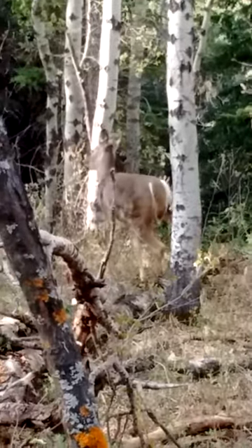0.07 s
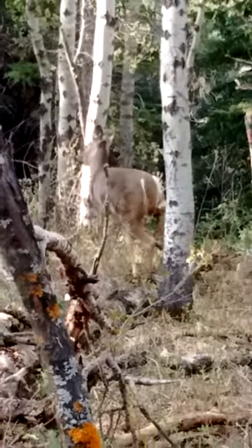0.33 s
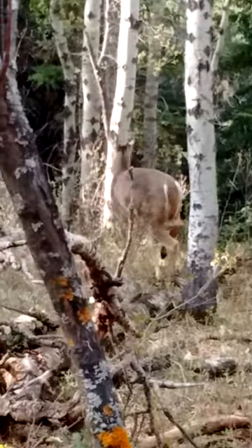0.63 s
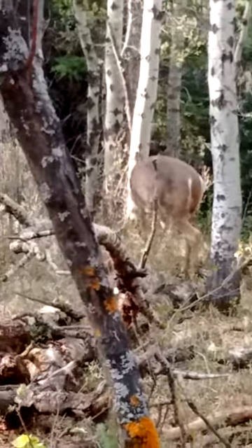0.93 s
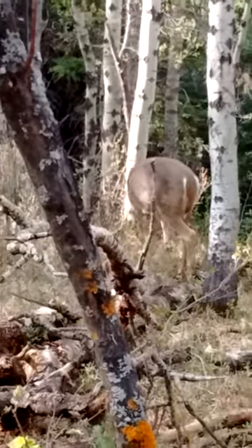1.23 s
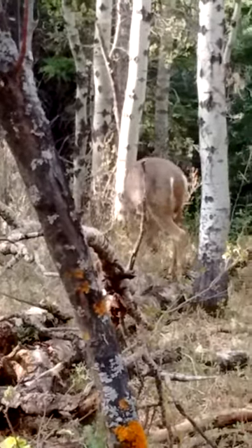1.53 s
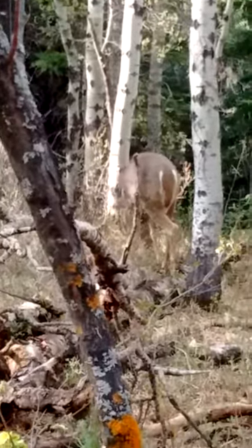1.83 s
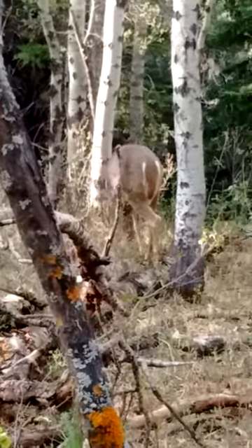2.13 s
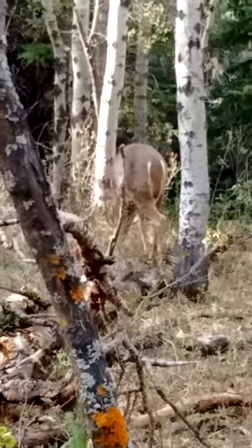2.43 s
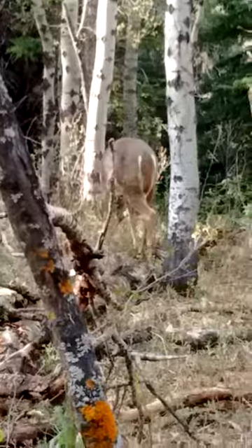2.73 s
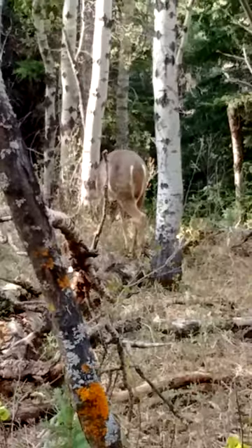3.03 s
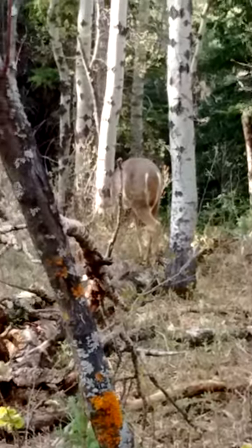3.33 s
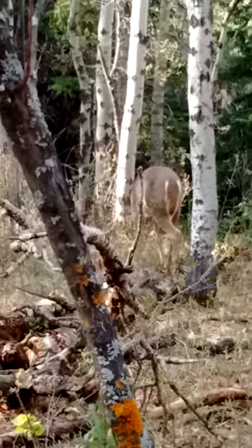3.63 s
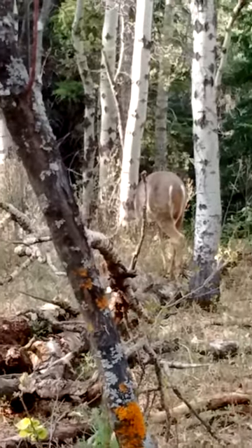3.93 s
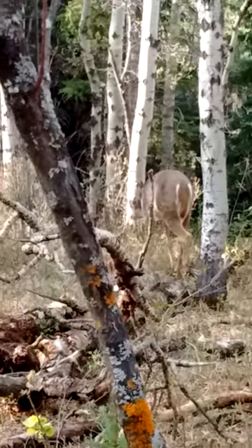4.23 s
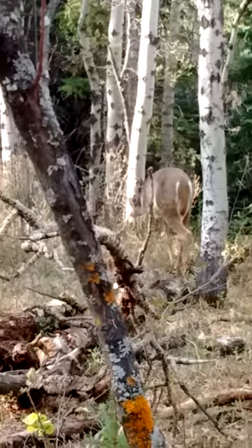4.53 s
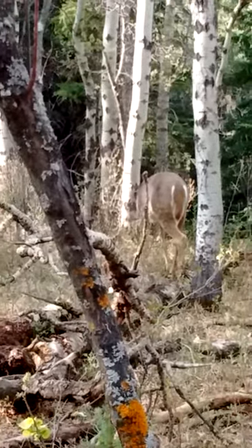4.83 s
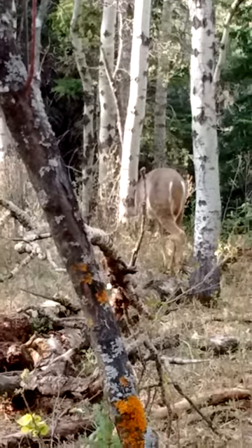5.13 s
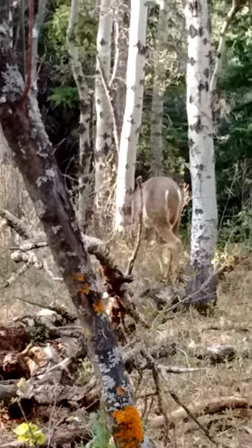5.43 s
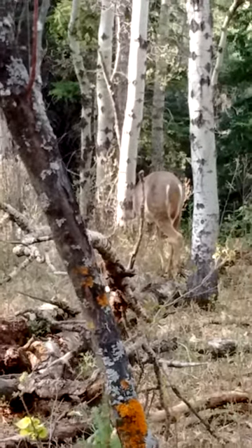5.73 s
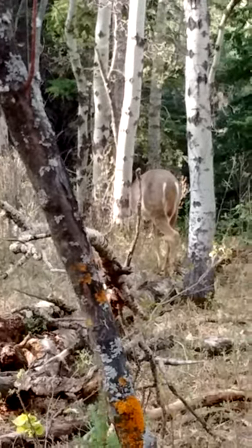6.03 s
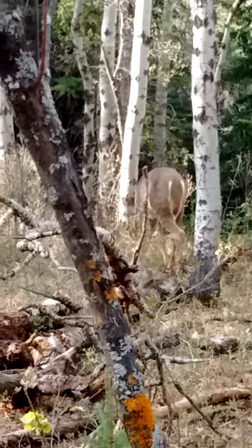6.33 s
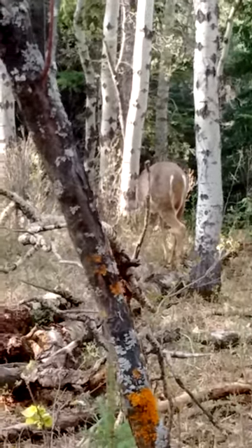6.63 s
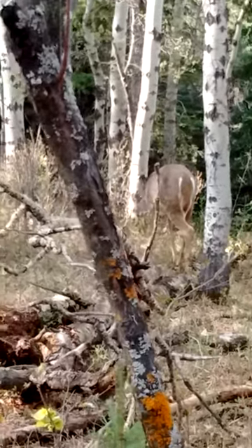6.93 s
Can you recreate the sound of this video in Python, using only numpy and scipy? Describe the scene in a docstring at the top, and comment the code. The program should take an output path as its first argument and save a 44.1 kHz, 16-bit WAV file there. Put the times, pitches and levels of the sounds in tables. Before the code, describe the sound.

A low wash of air and a faint hiss of leaves run steadily in quiet woods. About a second in, cloth brushes the microphone of a hand-held camera in four quick, scratchy strokes, then settles in faint slides. A small tick and a few soft, low bumps of the hand follow, leaving only the quiet air.

```python
"""Cloth on a camera in quiet woods

A low wash of air and a faint hiss of leaves surround a hand-held camera; the hand bumps and knocks
the case. Cloth brushes one microphone port in four quick strokes, its threads slipping and catching,
then settles. The stereo is widened by subtracting each port, delayed, from the other."""
import sys
import numpy as np
from scipy import signal
from scipy.fft import rfft, irfft, next_fast_len
from scipy.io import wavfile
from scipy.ndimage import uniform_filter1d

SR = 44100
rng = np.random.default_rng(int(sys.argv[2]) if len(sys.argv) > 2 else 0)


def put_to_file(sound):
    """Save the sound as 16-bit audio at rate SR, in the file named by the first command-line argument."""
    columns = np.atleast_2d(sound).T  # one column per channel
    safe = np.clip(columns, -1, 1)
    whole_steps = np.round(safe * 32767)
    wavfile.write(sys.argv[1], SR, whole_steps.astype(np.int16))


N = 307818


def from_db(db):
    """Decibels to amplitude gain."""
    return 10 ** (np.asarray(db) / 20)


def unit_rms(x):
    """Scale to rms 1."""
    return x / np.sqrt(np.mean(x ** 2) + 1e-20)


def db_at(spectrum, hz):
    """Interpolate a spectrum on a log frequency axis."""
    points_hz, points_db = np.transpose(spectrum)
    return np.interp(np.log(hz + 1), np.log(points_hz + 1), points_db)


def add_at(mix, time_s, sound):
    """Mix a sound in place, from time_s on."""
    part = mix[round(time_s * SR):][:len(sound)]
    part += sound[:len(part)]


def colour(x, spectrum, size=4096):
    """Minimum-phase filter with the spectrum's shape and unit power gain."""
    log_gain = np.log(from_db(db_at(spectrum, abs(np.fft.fftfreq(size, 1 / SR)))))
    response = np.exp(np.conj(signal.hilbert(log_gain)))
    taps = np.fft.ifft(response).real
    return signal.oaconvolve(x, taps / np.linalg.norm(taps))[:len(x)]


def resonate(x, hz, width_hz):
    """Unity-gain resonance that tracks the curve hz."""
    carrier = np.exp(2j * np.pi * np.cumsum(hz) / SR)
    pole = np.exp(-np.pi * width_hz / SR)
    return 2 * (carrier * signal.lfilter([1 - pole], [1, -pole], x / carrier)).real


# air and leaves, in phase and in antiphase at the ports: (frequency [Hz], density [dB/Hz])
AIR_IN_PHASE = [(25, -69.5), (60, -70), (130, -74), (220, -81.5), (400, -88), (700, -91.5), (1000, -90),
                (1500, -94.5), (2400, -97.5), (4200, -102), (6400, -109), (8500, -105), (15000, -108)]
AIR_ANTIPHASE = [(25, -77.5), (60, -75), (130, -72), (220, -72), (400, -78.5), (700, -80), (1000, -82.5),
                 (1500, -93.5), (2400, -96.5), (4200, -101), (6400, -109), (8500, -105), (15000, -108)]
# brief dips in the air: (centre [s], depth [dB], half length [s])
LULLS = [(5.773, -2, 0.083), (6.796, -2.5, 0.21)]


def air(spectrum, patch_db, trim_db=-0.02):
    """Wash of air and leaves: noise that drifts in patches and sinks in the lulls."""
    hz, frame_s, bins = signal.stft(rng.standard_normal(N) * np.sqrt(SR / 2), SR, nperseg=2048)
    patches = uniform_filter1d(rng.standard_normal(bins.shape), size=14, axis=0)
    patches = unit_rms(uniform_filter1d(patches, size=5, axis=1))
    lull_db = sum(db * np.exp(-((frame_s - centre_s) / half_s) ** 2) for centre_s, db, half_s in LULLS)
    density_db = trim_db + db_at(spectrum, hz)[:, None] + patch_db * patches + lull_db
    return signal.istft(bins * from_db(density_db), SR, nperseg=2048)[1][:N]


# soft jolts of the shifting grip: (time [s], impulse [dB], contact [s])
GRIP_BUMPS = [(0.034, -3, 0.011), (3.497, -6.5, 0.0098), (3.596, 2, 0.016), (3.708, 0, 0.018),
              (3.769, 5, 0.016)]
# knocks of the hand: (time [s], impulse [dB], contact [s])
HAND_KNOCKS = [(0.0385, -0.5, 0.00011), (0.925, -9.5, 0.0015), (0.957, -6, 0.0027), (1.198, -8, 0.00081),
               (2.6332, 1.5, 0.00007)]
# case response, a dull thump with a short ring and a tiny tick: (frequency [Hz], relative level [dB])
CASE_SPECTRUM = [(15, -18), (45, -3), (105, 5.5), (250, -3.5), (550, -12), (1000, -26.5), (1500, -26.5),
                 (1830, -24), (2200, -39), (3400, -34), (5200, -45), (6800, -37), (8400, -30), (12000, -38),
                 (16000, -52)]


def case_impacts(impacts):
    """Each impact is one force pulse into the case; longer contact is duller."""
    force = np.zeros(N)
    for time_s, impulse_db, contact_s in impacts:
        pulse = np.hanning(max(round(contact_s * SR), 1) + 2)
        add_at(force, time_s, from_db(impulse_db) * pulse / pulse.sum())
    return colour(force, CASE_SPECTRUM)


# dry snap of cloth: (frequency [Hz], relative level [dB])
SNAP_SPECTRUM = [(200, -27), (1000, 3), (2500, -1), (3800, 6), (6000, -7), (8500, -5), (11000, -21),
                 (14000, -27)]


def snap(time_s=0.897, energy_db=-13):
    """The cloth first touches the case: one click, almost no ring."""
    return colour(from_db(energy_db) * signal.unit_impulse(N, round(time_s * SR)), SNAP_SPECTRUM)


def envelope_db(t, hold_s, attack_s, release_s):
    """Rise to 0 dB at t = 0, hold, fall ever faster; attack_s and release_s each span 14.5 dB."""
    before = np.maximum(-t, 0) / attack_s
    after = np.maximum(t - hold_s, 0) / release_s
    return -14.5 * (before + after ** 1.35)


def friction(level_db, tilt_db_oct, slips_per_s, spread_db, hiss_share, judder_db, pivot_hz=4000):
    """Threads slip in tiny uneven clicks over a smooth hiss; contact pressure judders."""
    slips = rng.standard_normal(N) * from_db(spread_db * np.minimum(rng.exponential(1, N), 3))
    slips *= rng.random(N) < slips_per_s / SR
    rub = np.sqrt(1 - hiss_share) * unit_rms(slips) + np.sqrt(hiss_share) * rng.standard_normal(N)
    hz, frame_s, bins = signal.stft(rub, SR, nperseg=256)
    octaves = np.log2(np.maximum(hz, 1000) / pivot_hz)
    tilt_db = octaves[:, None] * np.interp(frame_s * SR, np.arange(N), tilt_db_oct)
    tilted = signal.istft(bins * from_db(tilt_db), SR, nperseg=256)[1][:N]
    judder = unit_rms(uniform_filter1d(rng.standard_normal(N), size=180))  # 4 ms
    return tilted * from_db(np.maximum(level_db, -200) + judder_db * judder)


# cloth strokes: (time at full speed [s], hold [s], level [dB], attack [s], release [s],
#   start tilt [dB/oct], end tilt [dB/oct], resonance scale [ratio], zip start [Hz])
STROKES = [ (0.921, 0.079, -36, 0.0087, 0.0071, 6, -1, 1.02, 4280),
           (1.129, 0.02, -29.5, 0.00069, 0.031, -3, 1, 0.99, 4160),
           (1.198, 0.064, -25.5, 0.03, 0.033, -0.1, 1.2, 1.04, 3980),
           (1.292, 0.033, -26.5, 0.045, 0.034, 2, 1, 0.98, 3720), ]
# rubbing cloth at the port: (frequency [Hz], relative level [dB])
RUB_SPECTRUM = [(40, -20), (180, -7.5), (500, -17.5), (1000, -15), (2000, -10), (2800, -4.5), (3800, -0.5),
                (4700, -5), (5500, -12), (6150, -13), (7000, -11), (8600, -10), (10000, -20),
                (11300, -24.5), (12400, -26), (14000, -65)]
SAG_DB_PER_S = -24
ZIP_DB, ZIP_WIDTH_HZ, ZIP_CLIMB_HZ_PER_S = -5, 550, 4300


def stroke(time_s, hold_s, db, attack_s, release_s, start_tilt, end_tilt, scale, zip_hz):
    """Cloth drags and slowly loses pressure; the ribs of the weave add a fuzzy, climbing zip."""
    t = np.arange(N) / SR - time_s
    held_s = np.clip(t, 0, hold_s)
    level_db = db + envelope_db(t, hold_s, attack_s, release_s) + SAG_DB_PER_S * held_s
    tilt_db_oct = start_tilt + (end_tilt - start_tilt) * held_s / hold_s
    drag = friction(level_db, tilt_db_oct, slips_per_s=7000, spread_db=1.5, hiss_share=0.75, judder_db=1.1)
    rib_hz = zip_hz + ZIP_CLIMB_HZ_PER_S * held_s
    ribs = resonate(resonate(rng.standard_normal(N), rib_hz, ZIP_WIDTH_HZ), rib_hz, ZIP_WIDTH_HZ)
    zipping = unit_rms(ribs) * from_db(np.maximum(level_db, -200) + ZIP_DB)
    return colour(drag, [(hz * scale, gain_db) for hz, gain_db in RUB_SPECTRUM]) + zipping


# harder presses of the cloth: (peak time [s], level [dB], half length [s])
PRESSES = [(0.924, -41.5, 0.016), (0.984, -39, 0.018), (1.206, -35.5, 0.02), (1.305, -37, 0.014)]
# low, rough rasp: (frequency [Hz], relative level [dB])
RASP_SPECTRUM = [(50, -22), (170, 3), (500, -8), (1300, -2.5), (2000, 0), (2800, 1.5), (3800, -14),
                 (6000, -39)]


def rasp():
    """Under pressure the threads slip in fewer, coarser jerks."""
    t = np.arange(N) / SR
    jerks = friction(0, np.zeros(N), slips_per_s=1100, spread_db=2.5, hiss_share=0.4, judder_db=1.5)
    pressure = sum(from_db(db) * np.exp(-((t - peak_s) / half_s) ** 2) for peak_s, db, half_s in PRESSES)
    return colour(jerks * pressure, RASP_SPECTRUM)


# catches of the weave: (time [s], level [dB], length [s])
CATCHES = [(0.942, -33.5, 0.017), (0.998, -41, 0.004), (1.1296, -31.5, 0.0056), (1.1728, -26.5, 0.0082),
           (1.197, -23, 0.0036), (1.2035, -27, 0.008), (1.2945, -25, 0.0039), (1.3005, -27, 0.0027)]


def catches():
    """The weave catches and lets go in short noise bursts."""
    bursts = np.zeros(N)
    for time_s, db, length_s in CATCHES:
        count = max(int(length_s * SR), 8)
        burst = rng.standard_normal(SR)[:count] * signal.windows.tukey(count, 0.5)
        add_at(bursts, time_s, from_db(db) * unit_rms(burst))
    return colour(bursts, RUB_SPECTRUM)


# faint slides: (peak time [s], level [dB], release [s], tilt [dB/oct])
SLIDES = [(1.598, -53, 0.22, 6), (1.928, -53, 0.041, -3), (2.052, -54.5, 0.11, 0)]
# lightly sliding cloth, thin and airy: (frequency [Hz], relative level [dB])
SLIDE_SPECTRUM = [(200, -12), (1000, -8), (2700, -9), (3600, 2), (4700, -5.5), (6000, -22), (7500, -12),
                  (9800, -12.5), (11000, -22), (14000, -30)]


def settling(attack_s=0.054):
    """The cloth settles in light slides with few slips, each fading into the next."""
    t = np.arange(N) / SR
    slides_db = [db + envelope_db(t - peak_s, 0, attack_s, release_s) for peak_s, db, release_s, _ in SLIDES]
    level_db = np.max(slides_db, axis=0)
    peaks_s, _, _, tilts = np.transpose(SLIDES)
    tilt_db_oct = np.interp(t, peaks_s, tilts)
    rub = friction(level_db, tilt_db_oct, slips_per_s=1700, spread_db=1.5, hiss_share=0.9, judder_db=2.0)
    return colour(rub, SLIDE_SPECTRUM)


def cloth():
    """The whole rustle, with fresh noise on each call."""
    return catches() + sum(stroke(*row) for row in STROKES) + rasp() + settling()


def scene():
    """Pressure at the ports: bumps shake both; cloth and knocks reach mainly the right."""
    common = air(AIR_IN_PHASE, patch_db=1.13) + case_impacts(GRIP_BUMPS)
    antiphase = air(AIR_ANTIPHASE, patch_db=1.2)
    knocks = case_impacts(HAND_KNOCKS)
    near = cloth() + snap() + knocks
    # some rustle scatters round the case and reaches the far port jumbled
    far = from_db(-6.5) * cloth() + from_db(-20) * knocks
    return np.array([common + antiphase + far, common - antiphase + near])


# share of the other port subtracted, capped at 0 dB in use: (frequency [Hz], gain [dB])
CROSSFEED = [(30, -0.5), (100, 1), (1500, -6), (3200, -3.5), (4500, -8), (6400, -1.5), (8000, -9),
             (9500, -17), (11000, -42), (14000, -44)]
# channel gains: (left [dB], right [dB])
CHANNEL_DB = [0.99, 0]
PORT_DELAY_S, CUTOFF_HZ = 0.000313, 15600


def record(dry):
    """Widen: each port loses a copy of the other, delayed by the travel between them; then low-pass."""
    hz = np.fft.rfftfreq(next_fast_len(N + 64), 1 / SR)
    size = 2 * (len(hz) - 1)
    ports = rfft(dry, size)
    crossfeed = from_db(np.minimum(db_at(CROSSFEED, hz), 0)) * np.exp(-2j * np.pi * hz * PORT_DELAY_S)
    wide = irfft(ports - crossfeed * ports[::-1], size)[:, :N] * from_db(CHANNEL_DB)[:, None]
    lowpass = signal.firwin(511, CUTOFF_HZ, window=("kaiser", 9), fs=SR)
    return signal.oaconvolve(wide, lowpass[None], "same")


dry = scene()
out = record(dry)
put_to_file(out)
```